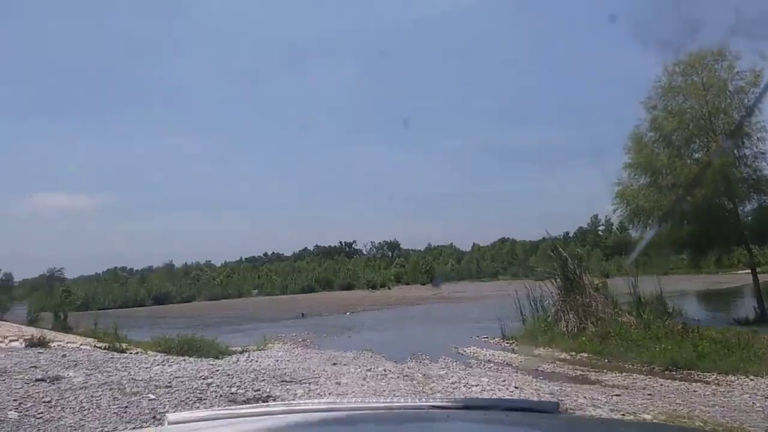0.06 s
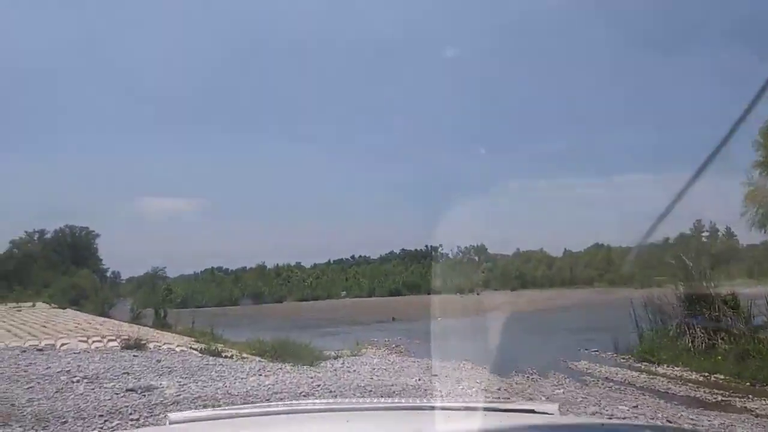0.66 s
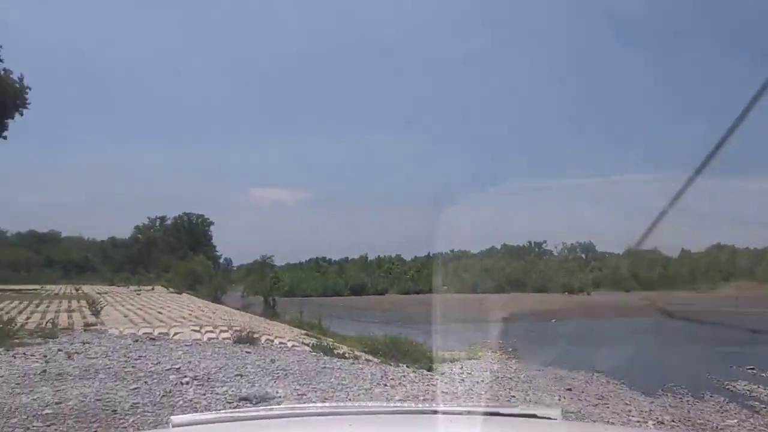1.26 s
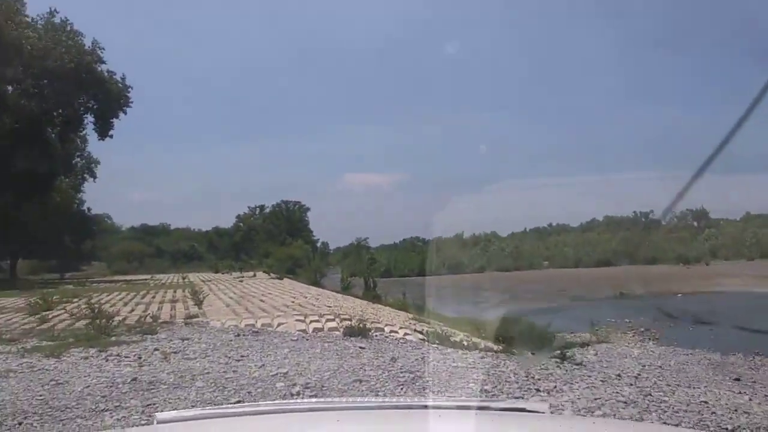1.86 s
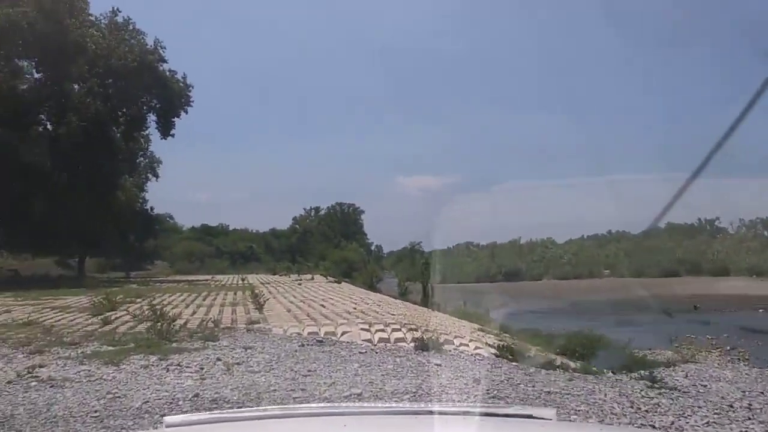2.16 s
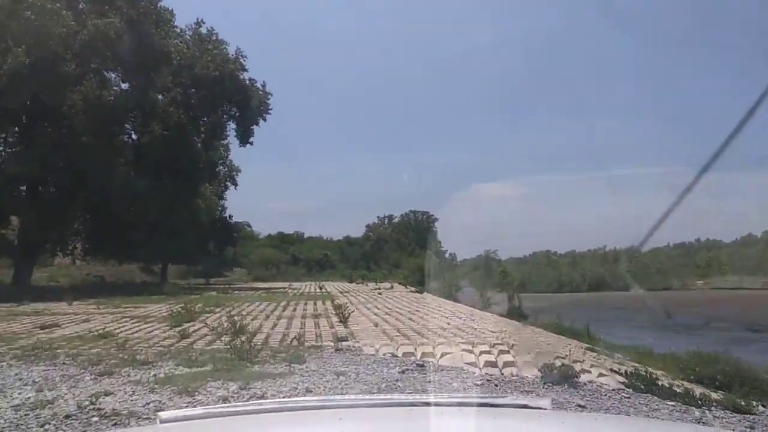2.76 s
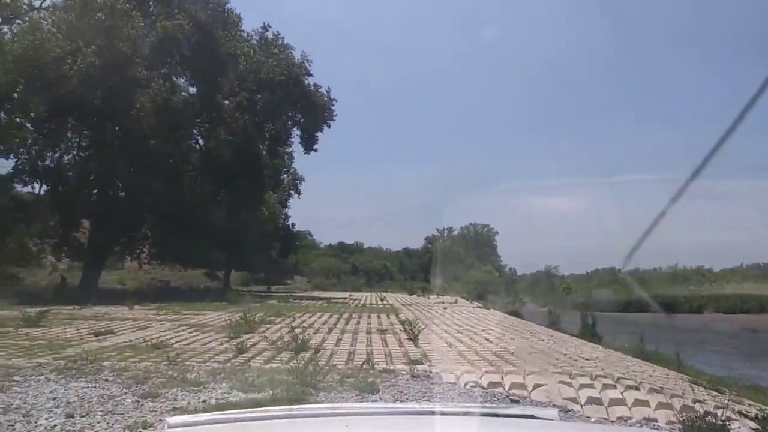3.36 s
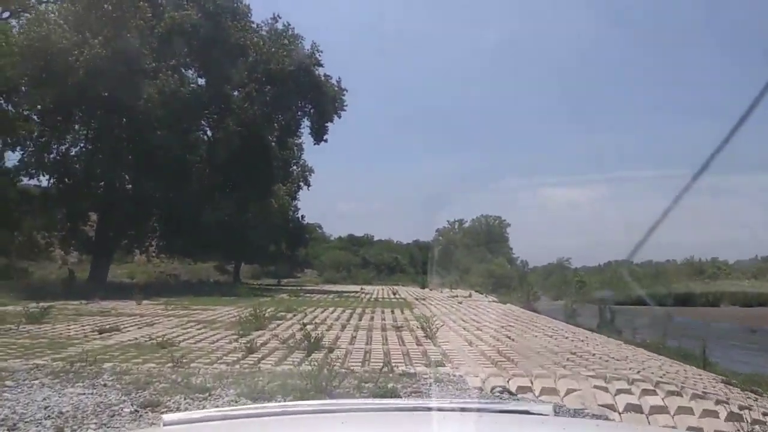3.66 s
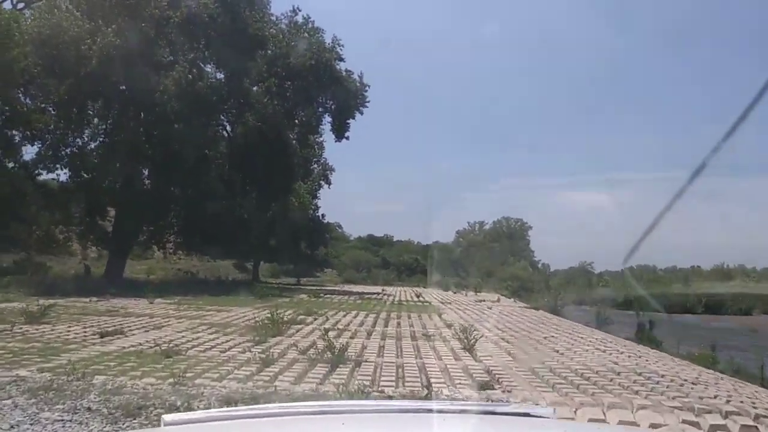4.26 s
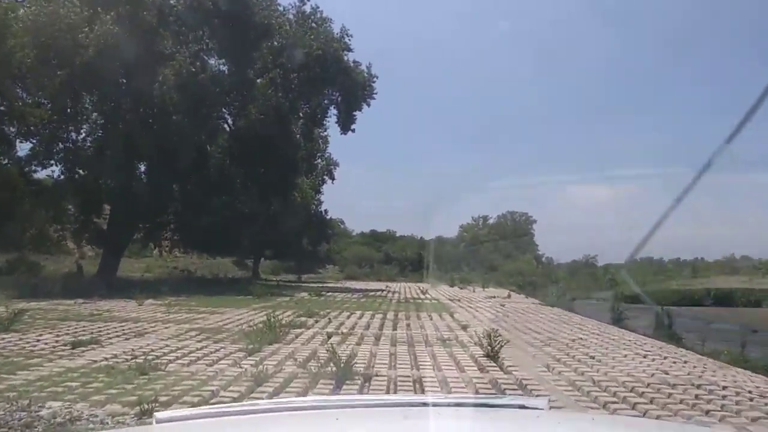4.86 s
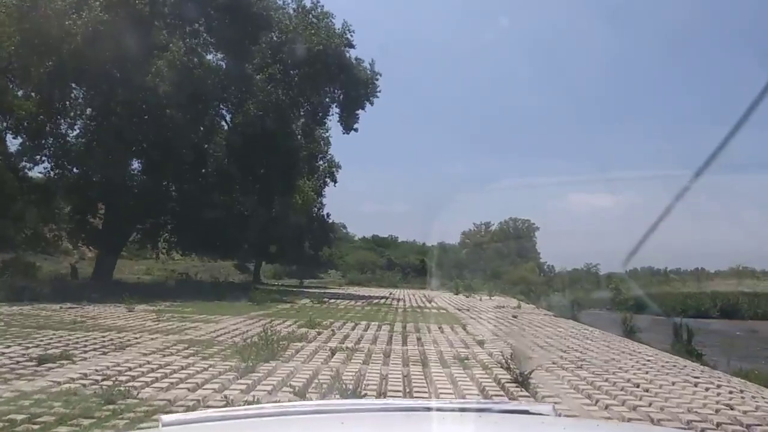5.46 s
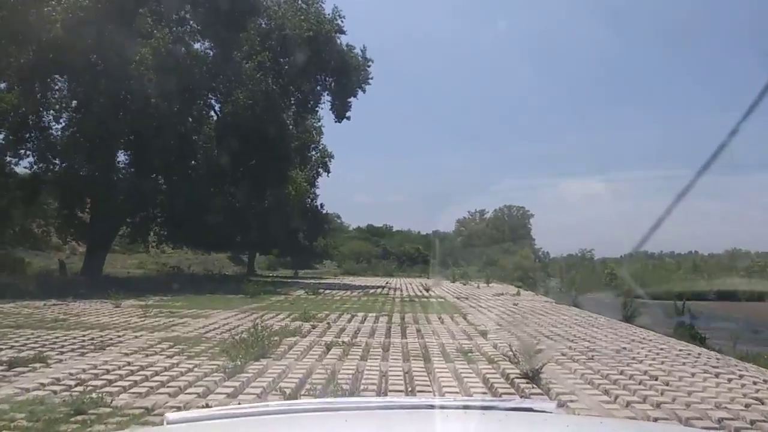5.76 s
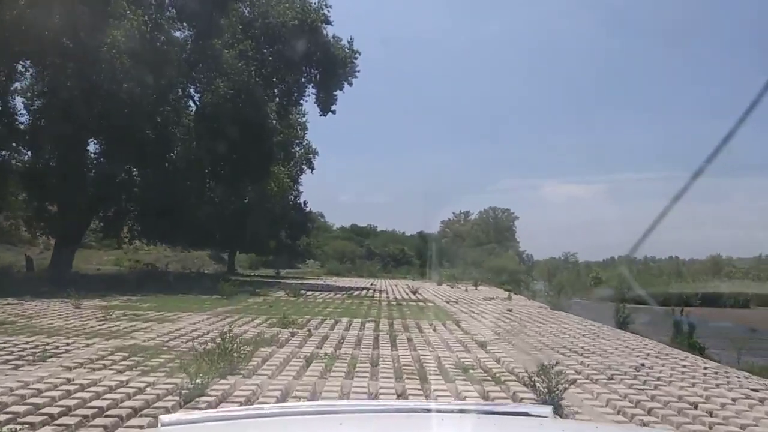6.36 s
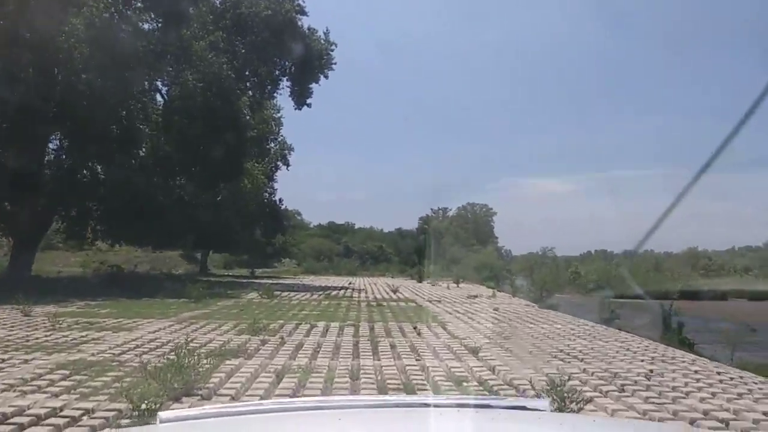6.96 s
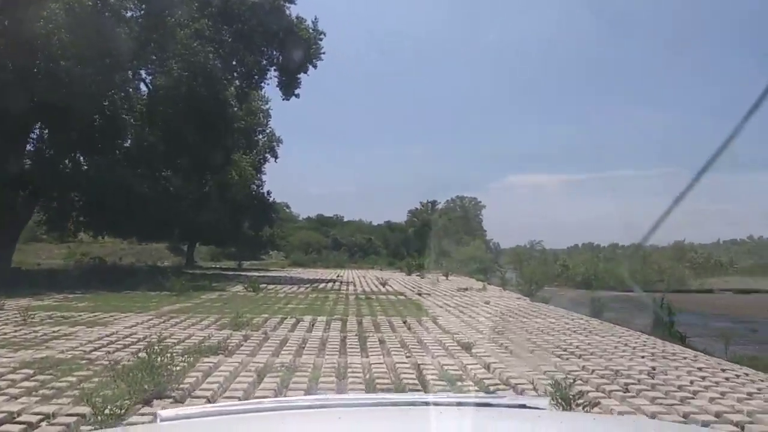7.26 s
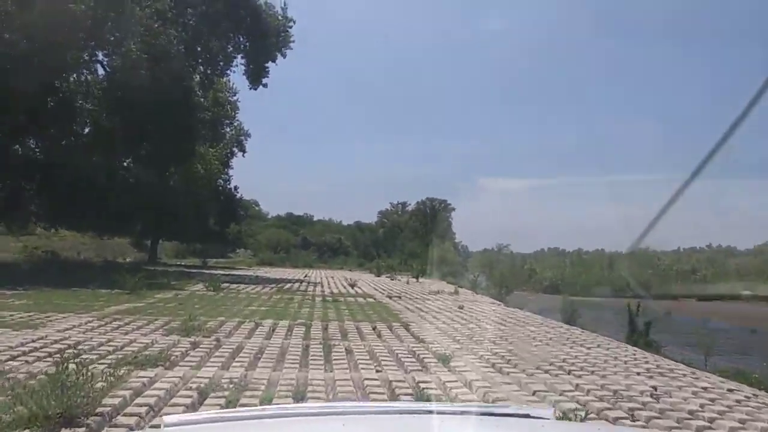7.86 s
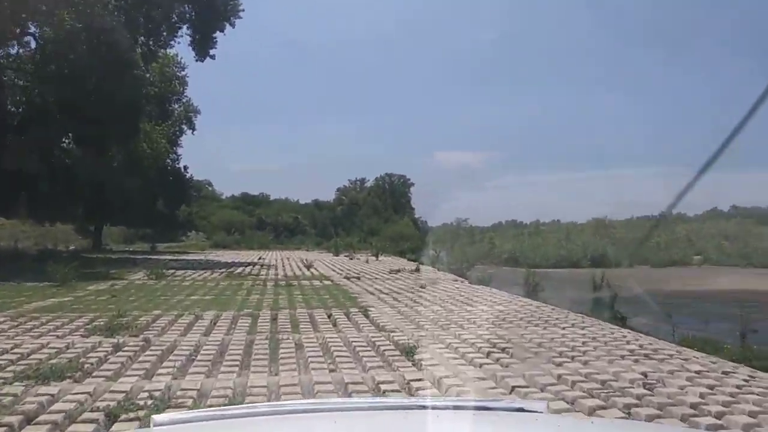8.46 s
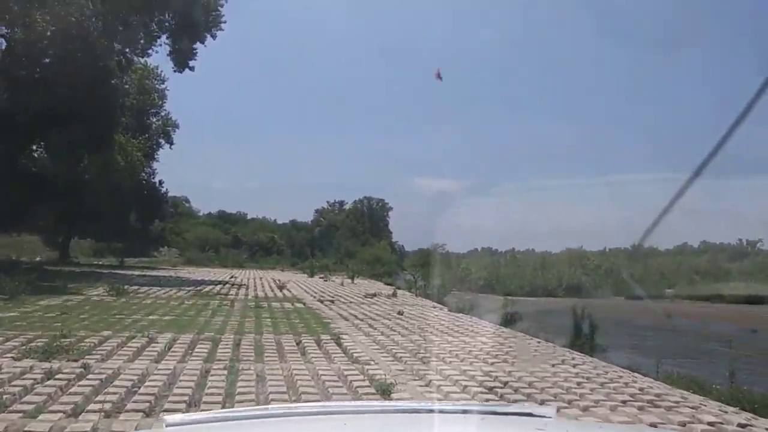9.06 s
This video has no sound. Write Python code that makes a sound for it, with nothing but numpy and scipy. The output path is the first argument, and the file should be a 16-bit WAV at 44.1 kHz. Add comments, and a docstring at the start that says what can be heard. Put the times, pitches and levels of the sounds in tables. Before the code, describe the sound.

A pickup truck creeps over gravel and onto concrete pavers, heard from inside the cab. The engine drones low near idle, rising briefly with one touch of throttle at the start. Stones grind, crackle and pop under the tyres throughout. Rough ground brings a low rumble, rattling panels and irregular knocks from the body, with the heaviest booming jolt a little past halfway. Small hard pieces clink faintly now and then.

```python
"""A low engine drone and crunching gravel, heard from the cab of a pickup creeping onto concrete pavers.
The firing tone stays near idle after one touch of throttle; its overtones set a panel buzzing.
Rough ground booms in the cab's air, rattles the panels and makes the body knock.
Stones grind, pop and slide under the tyres. Now and then something small and hard clinks,
and a thin hiss comes and goes."""
import sys
import numpy as np
from scipy import signal
from scipy.fft import rfft, irfft, next_fast_len
from scipy.io import wavfile
from scipy.ndimage import map_coordinates

SR = 44100
rng = np.random.default_rng(int(sys.argv[2]) if len(sys.argv) > 2 else 0)


def digitize_waveform(pressure):
    """Quantize a signal to 16-bit integers and store it at the path in sys.argv[1].

    Rows of a 2-D input are taken as channels; values are limited to [-1, 1].
    """
    field = np.atleast_2d(pressure).T
    bounded = np.clip(field, -1, 1)
    quanta = np.round(bounded * 32767).astype(np.int16)
    wavfile.write(sys.argv[1], SR, quanta)


N = 406602

# Engine speed. Each row: time in seconds, firing rate in Hz.
FIRING_HZ = [(0, 51.86), (.36, 51.6), (.46, 59.1), (.55, 65.8), (.65, 72.5), (.75, 72.6), (.87, 64),
             (1.1, 58.1), (1.6, 58.67), (2.3, 57.1), (4.5, 55.8), (8, 55.28), (8.6, 53.92), (9.22, 55.36)]
# Engine load. Each row: time in seconds, firing tone level in dB.
LOAD_DB = [(0, -25), (.35, -24.5), (.58, -21), (1.2, -24), (1.8, -21), (2.1, -24.5), (2.62, -20),
           (3.3, -25), (3.52, -19), (3.8, -23), (4.28, -21), (4.8, -22), (5.15, -20), (6.3, -19.5),
           (7.1, -24.5), (7.95, -22), (8.65, -24), (9.22, -20.5)]
# Ground shake and low tyre roar. Each row: time in seconds, drive in dB over average.
SHAKE_DB = [(0, -7.5), (.2, -9), (.58, -1), (.88, -5), (1.03, -4), (1.6, 1), (2.1, -2), (2.85, 1),
            (3.72, 1), (4.0, -3), (4.5, 1.5), (5.25, 0.5), (5.5, 8.5), (5.7, 1.5), (6.75, 0), (7.02, -3),
            (7.6, -3.5), (7.9, 1.5), (8.2, -0.5), (8.5, 1), (9.05, -9), (9.22, 5)]
ROAR_DB = [(0, -11.5), (.2, -1.5), (.35, -5), (.56, 3.5), (.88, 1.5), (1.03, -5), (1.28, 4), (1.7, -1.5),
           (2.62, 0.5), (2.85, 2.5), (3.15, -0.5), (3.35, 3), (4.1, -2.5), (4.55, 2), (4.7, -5),
           (4.92, 1.5), (5.25, -2), (5.5, 8), (5.72, -0.5), (6.5, 1.5), (6.78, 1), (7.55, -3), (7.8, 1),
           (8.7, -3.5), (9.22, -7.5)]
# Loose gravel. Each row: time in seconds, coarse stones and grit in relative dB.
GRAVEL_DB = [(0, -53, -53), (.3, -56.5, -58.5), (.58, -44, -43.5), (.8, -49, -52.5), (1.2, -44, -48),
             (1.55, -46.5, -49.5), (2.1, -44, -43.5), (2.57, -50, -52.5), (2.9, -43, -42), (3.08, -46, -50),
             (3.38, -46, -43.5), (4.1, -48, -47.5), (5.3, -44, -46), (5.5, -40.5, -42), (6.05, -49, -48.5),
             (6.55, -49, -47.5), (6.8, -44, -40), (7.02, -56, -51.5), (7.27, -45, -44.5),
             (7.58, -53.5, -51.5), (7.9, -51, -45.5), (8.35, -46, -48), (8.88, -47.5, -52.5),
             (9.22, -45, -47)]

# Hiss swells. Each row: centre in seconds, level in dB, half length in seconds.
HISSES = [(1.102, -57, 0.19), (3.75, -71, 0.22), (7.88, -55, 0.17)]
# Loudest snapping stones. Each row: start in seconds, then level, low body and high edge in relative dB.
POPS = [(.2638, -34.5, -6, -36), (.336, -38.5, -2, -38), (0.411, -34, -0.5, -33), (.425, -52, 13, -30),
        (0.529, -33.5, 1, -33), (.596, -45, 11, -30), (0.663, -34.5, 7.5, -25), (0.7188, -39, 9.5, -32),
        (0.769, -48, 10, -28), (0.9351, -36.5, 4, -33), (0.9866, -35, 6.5, -31), (1.108, -46.5, 10, -32),
        (1.1625, -30.5, -1, -35), (1.2294, -35, 8.5, -35), (1.297, -34, 8, -28), (1.33, -33, -1, -31),
        (1.356, -31, 5.5, -29), (1.393, -37.5, 7, -28), (1.444, -29, 0.5, -33), (1.464, -50, 9, -30),
        (1.696, -27.5, -17, -33), (2.1106, -31, 1, -31), (2.203, -37, -10, -26), (2.287, -31.5, -9, -35),
        (2.463, -28.5, -10, -37), (2.804, -29.5, -9, -33), (2.9308, -38, 10, -26), (2.9685, -27, -2, -33),
        (2.995, -35, 9.5, -34), (3.036, -30, -11, -34), (3.0998, -29, -12, -33), (3.2037, -30, -5, -36),
        (3.225, -28, -3, -32), (3.289, -28, -15, -34), (3.324, -34, -6, -28), (3.406, -28, -3.5, -28),
        (3.472, -36, -15, -22), (3.526, -33.5, -13, -32), (3.553, -40, -8, -30), (3.593, -38, -6, -28),
        (3.7488, -33, 3, -32), (3.823, -26.5, -2, -28), (3.8767, -32.5, 6, -35), (4.1591, -32.5, -19, -31),
        (4.375, -35, 1, -30), (4.449, -37.5, 6, -32), (4.574, -50, 15, -32), (4.618, -30.5, -9, -34),
        (4.644, -47, 13, -32), (4.746, -41, 8.5, -32), (4.7792, -29, 2, -25), (4.8346, -23.5, 2.5, -19),
        (4.9066, -31.5, 4, -28), (4.9326, -32.5, 4, -29), (5.04, -32.5, 3, -34), (5.1007, -37.5, 9, -29),
        (5.162, -38, 9, -26), (5.185, -31, -8, -30), (5.215, -28, -3, -32), (5.29, -48, 19.5, -33),
        (5.4477, -24, -18, -33), (5.5173, -30, 1, -30), (5.638, -29.5, -1, -32), (5.662, -27, 0, -25),
        (5.692, -23.5, -1.5, -22), (5.723, -28, -5, -27), (5.893, -43.5, 14, -32), (5.970, -32, -7, -30),
        (5.982, -37, -6, -21), (6.132, -31.5, -12, -19), (6.1588, -29.5, -13, -30), (6.222, -34, -16, -32),
        (6.452, -29, -3.5, -33), (6.478, -34, -5, -19), (6.52, -27.5, -2.5, -35), (6.587, -44, 7, -32),
        (6.651, -48, 12, -32), (6.77, -29, -2.5, -30), (6.805, -35, -15, -20), (6.8795, -33, -8, -17),
        (7.019, -35, -8, -26), (7.055, -42, 4, -32), (7.166, -31, -5, -32), (7.24, -36, 1, -29),
        (7.2712, -22.5, -15, -21), (7.303, -31, -13, -34), (7.3472, -33.5, 4, -27), (7.38, -32, -5, -29),
        (7.534, -45.5, 15, -33), (7.761, -29, -16, -24), (7.964, -27.5, -8, -28), (7.992, -29, -12, -20),
        (8.114, -26.5, 2, -22), (8.1413, -33.5, 7, -22), (8.177, -23, -1.5, -18), (8.206, -32.5, 5.5, -25),
        (8.242, -33, -9, -26), (8.251, -36, -4, -11), (8.276, -29, -10, -28), (8.335, -45, 12, -32),
        (8.395, -41.5, 11, -35), (8.422, -31, -15, -32), (8.443, -41, -8, -20), (8.475, -32.5, -4, -32),
        (8.5838, -25.5, -8, -33), (8.626, -43, -4, -32), (8.6492, -28.5, -6, -35), (8.7325, -30.5, -2, -29),
        (8.8108, -34, 8, -36), (8.875, -49.5, 16, -32), (9.108, -39, 9.5, -32)]
# Wheel drops into ruts and paver gaps. Each row: start in seconds, heave and boom in relative dB.
JOLTS = [(0.886, -5.5, -8), (1.572, -29, -4), (1.788, -11, -17), (2.695, -28, -14), (2.85, -24, -19),
         (5.419, -6, -3.5), (5.477, -1.5, -7), (5.537, -2, -3), (6.2, -22, 0.5), (6.253, -28, -12)]
# Suspension and body blows. Each row: start in seconds, then ring, thud, clack and punch in relative dB.
KNOCKS = [(0.938, -11.5, -2, -31, -24), (1.565, -8.5, 2.5, -19, -26), (1.603, -12, 8, -16, -18),
          (1.787, -11.5, 12, -10, -25), (1.797, -7.5, 9, -10, -8), (1.813, -9.5, 7, -3.5, -9),
          (1.947, -10.5, 3.5, -0.5, -15), (2.112, -29, -9, 6, -26), (2.351, -8.5, 9, -3, -6.5),
          (2.413, -16, -10, -5, -24), (2.507, -9, 2.5, -9, -14), (2.651, -17, -6, -6, -27),
          (2.688, -10.5, 8.5, -7, -13), (2.700, -12, 16, -2, -13), (2.848, -12, 15, -11, -24),
          (3.287, -21, 0, 0, -16), (3.402, -21.5, 14, -6, -16), (3.751, -23.5, -8, 5, -19),
          (4.481, -17.5, 2, 4, -14), (4.53, -23, 14, 0, -31), (4.933, -17, -8, -6, -12),
          (4.999, -11, -11, -14, -15), (5.654, -27, -6, 10, -4), (5.75, -21.5, -3, 5.5, -19),
          (5.904, -14, 1, -15, -30), (6.171, -7, 2, -7, -12), (6.182, -4.5, -1, -21, -8),
          (6.29, -23, -6, -4, -29), (6.566, -7.5, -1, -20, -22), (6.773, -15, 10, -6, -14),
          (7.154, -9, -11, -9, -16), (8.649, -18.5, 8, -1, -16), (8.98, -27, 1, 0, -31),
          (9.076, -20, -4, 0, -28)]
# Small hard pieces. Each row: start in seconds, pitch in Hz, level in relative dB, t60 in seconds,
# mode spread as a share of the pitch.
CLINKS = [(1.411, 6960, -40, 0.064, 0.015), (1.612, 6700, -36, 0.095, 0.051),
          (1.635, 5340, -32, 0.11, 0.052), (2.856, 7050, -33, 0.1, 0.023), (3.68, 7060, -41, 0.075, 0.02),
          (4.245, 7160, -38, 0.088, 0.021), (4.456, 6980, -36, 0.061, 0.038),
          (4.484, 5250, -13, 0.023, 0.096), (5.754, 7400, -39, 0.13, .012),
          (7.461, 5740, -30, 0.094, 0.041), (7.462, 6700, -34, 0.09, 0.061),
          (9.146, 7340, -39, 0.09, 0.0067), (9.205, 7220, -30, 0.089, 0.0059)]
# Gravel giving way. Each row: start in seconds, level in dB, rise and t60 in seconds,
# coarse stones and high edge in relative dB.
SLIDES = [(1.788, -30.5, 0.019, 0.25, 1, -30), (1.865, -37, 0.036, 0.26, -5, -24),
          (4.374, -40, 0.011, 0.23, -2, -28), (4.482, -28.5, 0.004, 0.074, -11, -18),
          (4.525, -40, 0.016, 0.52, -6, -24), (5.636, -42, 0.033, 0.34, -0.5, -28),
          (6.17, -42, 0.013, 0.19, -13, -25), (7.69, -40.5, 0.056, 0.17, -12, -28),
          (8.95, -45.5, 0.1, 0.27, -7, -15)]

# Cab air modes, heave then boom. Each row: frequency in Hz, width in Hz.
CAB_MODES = [(66, 10.2), (135, 8.2)]
# Wheel well and body panel modes. Each row: frequency in Hz, width in Hz, gain in dB.
WELL_MODES = [(1393, 390, 10.5), (1558, 190, 12), (1730, 150, 7.5), (2133, 135, 9), (2980, 250, 0.5),
              (3690, 280, 4.5), (5300, 190, -3)]
PANEL_MODES = [(230, 11.7, -1.5), (273.3, 25, 2), (335.6, 26.3, 1), (410, 29.4, 2), (470.5, 31, 2),
               (516, 27, -2), (611.6, 40, -3.5), (745, 31, -4), (864, 49, -0.5), (924, 34, -6),
               (1010, 44, -10.5), (1280, 44, -17)]

# Noise spectra. Each row: frequency in Hz, relative density in dB.
BOOM_SPECTRUM = [(20, -45), (38, -30), (50, -6), (58, -3.5), (82, -5), (105, -5), (133, -.5), (165, -2),
                 (200, -23), (260, -31)]
TYRE_SPECTRUM = [(130, -61), (185, 1), (230, 3), (285, 0), (320, -2), (400, -7), (480, -20), (700, -50)]
RATTLE_SPECTRUM = [(280, -50), (420, -1), (490, 1.5), (580, -2.5), (720, -4.5), (900, -7.5), (1050, -13.5),
                   (1400, -22), (2500, -27)]
COARSE_SPECTRUM = [(700, -39), (1100, -3), (1550, -2.5), (1900, -4), (2300, -4.5), (2750, -10.5),
                   (3500, -12.5), (5000, -26)]
GRIT_SPECTRUM = [(2000, 0), (3200, 2), (4400, 3), (5300, 1), (6800, -0.5), (7500, -4.5), (8100, -8.5),
                 (10200, -13.5), (12000, -21), (15800, -30)]
HISS_SPECTRUM = [(4000, -28), (4900, -1), (5250, 14), (5700, -18), (6600, 5), (7500, -32)]
SNAP_SPECTRUM = [(1800, -11), (3000, -1), (3800, -4.5), (4600, -5), (5400, 1.5), (5900, -3), (6600, 2),
                 (7550, -4.5), (8100, -11.5), (10400, -14), (11500, -29)]
EDGE_SPECTRUM = [(8000, -9), (10400, -12), (12000, 2), (15800, -7)]
RUSH_SPECTRUM = [(1500, -38), (2400, -2), (3500, 1), (4800, 1.5), (6400, 1.5), (7500, -6), (9500, -12),
                 (11500, -32), (15800, -46)]
SAND_SPECTRUM = [(7000, -6), (8500, -4), (11000, 0), (12500, -6), (15800, -12)]
FLOOR_SPECTRUM = [(2000, 3), (7500, -3), (8500, -2), (11400, -7.5), (12100, -10), (15800, -19)]


def amp(db):
    """Amplitude ratio from dB."""
    return 10 ** (np.asarray(db) / 20)


def unit(x):
    """x at rms 1."""
    return x / np.sqrt(np.mean(x ** 2) + 1e-20)


def curves(rows):
    """One value per sample for each column after the time."""
    times_s, *columns = np.transpose(rows)
    return [np.interp(np.arange(N) / SR, times_s, column) for column in columns]


def wobble(rate_hz):
    """Smooth random curve with knots at rate_hz."""
    knots = rng.standard_normal(int(N * rate_hz / SR) + 4)
    return map_coordinates(knots, [np.arange(N) * rate_hz / SR])


def colour(x, spectrum):
    """x shaped by a spectrum, at rms 1."""
    n_fft = next_fast_len(len(x) + 4096)
    hz, db = np.transpose(spectrum)
    log_hz = np.log(np.fft.rfftfreq(n_fft, 1 / SR) + 1)
    gain = amp(np.interp(log_hz, np.log(hz), db, left=-120, right=-120))
    return unit(irfft(rfft(x, n_fft) * gain, n_fft)[:len(x)])


def resonate(x, modes, shift, top_hz):
    """x through modes, each detuned by its shift factor, muffled above top_hz, at rms 1."""
    mode_hz, width_hz, db = np.transpose(modes)[:, :, None]
    hz = np.fft.rfftfreq(len(x), 1 / SR)
    damping = 1j * hz * width_hz
    response = amp(db) * damping / ((mode_hz * shift) ** 2 - hz ** 2 + damping)
    return unit(irfft(rfft(x) * response.sum(0) / (1 + (hz / top_hz) ** 6), len(x)))


def fade(t, rise_s, t60_s):
    """Linear rise, exponential decay."""
    return np.minimum(t / rise_s, 1) * np.exp(-np.log(1000) * np.maximum(t - rise_s, 0) / t60_s)


def add(track, start_s, sound):
    """Mix a sound into a track."""
    start = max(round(start_s * SR), 0)
    part = track[start:start + len(sound)]
    part += sound[:len(part)]


def impacts(spectrum, per_s, spread_db, t60_s, bed):
    """Random unequal impacts, smeared by reflections, over a bed of fainter ones, at rms 1."""
    hits = rng.random(N) < per_s / SR
    size = amp(spread_db * np.clip(rng.standard_normal(N), -1.6, 1.6))
    smear = fade(np.arange(SR // 8) / SR, 0.00067, t60_s)
    energy = np.abs(signal.fftconvolve(hits * size ** 2, smear ** 2)[:N])
    return unit(np.sqrt(energy / energy.mean() + bed) * colour(rng.standard_normal(N), spectrum))


def engine():
    """The firing tone swells as the cab rocks; unequal cylinders add weak orders around it."""
    sway_hz, sway_db, drift_cycles = 1.8, 3.2, 0.31
    firing_hz, = curves(FIRING_HZ)
    load_db, = curves(LOAD_DB)
    sway = np.sin(2 * np.pi * (sway_hz * np.arange(N) / SR + drift_cycles * wobble(sway_hz)))
    phase = 2 * np.pi * np.cumsum(firing_hz * (1 + 0.007 * wobble(12))) / SR
    tone = np.sin(phase)
    orders = np.array([6, 7, 9, 10, 12, 16, 24]) / 8
    for order, db in zip(orders, [-20, -14.5, -24, -15.5, -27, -14.5, -23.5]):
        tone += amp(db + 5.2 * wobble(5.5)) * np.sin(order * phase + 2 * np.pi * rng.random())
    level_db = load_db + sway_db * sway + 0.5 * wobble(14)
    return amp(level_db) * unit(tone) + panel_buzz(firing_hz, phase)


def panel_buzz(firing_hz, phase):
    """Engine overtones sing out as they sweep through a panel's resonance."""
    panel_hz, width_hz, idle_hz, db_per_hz = 274.3, 35, 56.4, 0.55
    level = amp(-35 + db_per_hz * (firing_hz - idle_hz) + 2.7 * wobble(9.7))
    buzz = np.zeros(N)
    for harmonic in (4, 5):
        response = 1 / (1 + 2j * (harmonic * firing_hz - panel_hz) / width_hz)
        buzz += (response * np.exp(1j * harmonic * phase)).real
    return level * buzz


def road():
    """Bumps roar through the tyres, boom in the cab and rattle its panels."""
    bump_hz = 13
    shared_bumps_db = 0.9 * wobble(bump_hz)

    def level(base_db, slope, drive):
        drive_db = curves(drive)[0] + shared_bumps_db
        return amp(base_db + slope * drive_db + 0.8 * wobble(bump_hz))

    boom = level(base_db=-24, slope=0.88, drive=SHAKE_DB)
    boom *= colour(rng.standard_normal(N), BOOM_SPECTRUM)
    tyres = level(base_db=-25.5, slope=0.68, drive=ROAR_DB)
    tyres *= impacts(TYRE_SPECTRUM, per_s=120, spread_db=-2, t60_s=0.04, bed=0.99)
    rattle = level(base_db=-37, slope=0.54, drive=SHAKE_DB)
    rattle *= impacts(RATTLE_SPECTRUM, per_s=80, spread_db=3, t60_s=0.12, bed=0.28)
    return boom + tyres + rattle


def crunch():
    """Coarse stones grind and fine grit crackles, varying from patch to patch."""
    coarse_db, grit_db = curves(GRAVEL_DB) + 0.56 * wobble(12)
    coarse = impacts(COARSE_SPECTRUM, per_s=110, spread_db=3.5, t60_s=0.045, bed=0.32)
    grit = impacts(GRIT_SPECTRUM, per_s=140, spread_db=4.5, t60_s=0.045, bed=0.63)
    return amp(coarse_db - 1.04) * coarse + amp(grit_db - 2) * grit


def hiss():
    """A narrow, fluttering hiss swells now and then over a faint steady one."""
    t = np.arange(N) / SR
    floor = amp(-67.5) * colour(rng.standard_normal(N), FLOOR_SPECTRUM)
    swells = sum(amp(db) * np.exp(-((t - centre_s) / half_s) ** 2) for centre_s, db, half_s in HISSES)
    flutter = amp(2.9 * wobble(27))
    return floor + swells * flutter * colour(rng.standard_normal(N), HISS_SPECTRUM)


def small_pops(per_s=3):
    """Lesser stones snap at random, following the grit level. Returns rows like POPS."""
    _, grit_db = curves(GRAVEL_DB)
    starts = np.flatnonzero(rng.random(N) < per_s / SR)
    mean_db, spread_db = (11.5, -6.5, -29), (1, 4, 3)
    levels_db = mean_db + spread_db * rng.standard_normal((len(starts), 3))
    return [(i / SR, grit_db[i] + db, body_db, edge_db)
            for i, (db, body_db, edge_db) in zip(starts, levels_db)]


def pops():
    """A pinched stone snaps free; big ones ring in the wheel well, sharp ones have a bright edge."""
    out, t = np.zeros(N), np.arange(SR // 10) / SR
    for start_s, db, body_db, edge_db in POPS + small_pops():
        snap_noise, body_noise, edge_noise = rng.standard_normal((3, len(t)))
        snap = colour(snap_noise, SNAP_SPECTRUM) * fade(t, 0.00052, 0.075)
        shift = 1 + 0.012 * rng.standard_normal((len(WELL_MODES), 1))
        ring = resonate(body_noise, WELL_MODES, shift, top_hz=6540)
        # The freed stone rattles on against its neighbours.
        tumble = amp(-14) * fade(t, 0.012 * np.exp(0.3 * rng.standard_normal()), 0.039)
        body = amp(body_db + 5) * ring * (fade(t, 0.0015, 0.046) + tumble)
        edge = amp(edge_db + 1) * colour(edge_noise, EDGE_SPECTRUM) * fade(t, 0.0005, 0.04)
        add(out, start_s - 0.0005, amp(db - 7.5) * (snap + body + edge))
    return out


def jolts():
    """A dropping wheel shakes the whole cab, and its air booms."""
    out, t = np.zeros(N), np.arange(SR // 2) / SR
    onset = np.minimum(t / 0.013, 1)
    for start_s, *levels_db in JOLTS:
        boom = sum(amp(db) * np.sin(2 * np.pi * hz * t) * np.exp(-np.pi * width_hz * t)
                   for (hz, width_hz), db in zip(CAB_MODES, levels_db))
        add(out, start_s, amp(-5.5) * boom * onset)
    return out


def knocks():
    """Each blow punches the body once and rings its panels: heavy ones thud, hard ones clack."""
    scatter_db, punch_lag_s, punch_half_cycles = 2.5, 0.00275, 0.64
    out, t = np.zeros(N), np.arange(SR // 5) / SR
    hz, width_hz, mode_db = np.transpose(PANEL_MODES)[:, :, None]
    rise_s = np.interp(hz, [280, 500], [0.012, 0.006])  # large, low panels start slower
    envelope = np.minimum(t / rise_s, 1) * np.exp(-np.pi * width_hz * t)
    punch_onset = t / (t + 0.0013)  # softened by rubber mounts
    for start_s, db, thud_db, clack_db, punch_db in KNOCKS:
        strength, detune, phase = rng.standard_normal((3, len(PANEL_MODES), 1))
        tilt_db = np.interp(hz, [300, 450, 850], [thud_db, 0, clack_db + 9])
        gains = amp(mode_db + tilt_db + scatter_db * strength)
        modes = np.sin(2 * np.pi * (hz * (1 + 0.027 * detune) * t + phase))
        add(out, start_s - 0.001, amp(db - 12) * (gains * modes * envelope).sum(0))
        punch_hz = 580 + 13.5 * clack_db
        cycles = punch_hz * (t - punch_lag_s)
        punch = np.sin(2 * np.pi * cycles) * np.exp(-(cycles / punch_half_cycles) ** 2)
        add(out, start_s, amp(punch_db) * punch_onset * punch)
    return out


def clinks():
    """Small hard pieces ring in a cluster of high modes: tight for a ping, wide for a clack."""
    out, t = np.zeros(N), np.arange(SR // 5) / SR
    for start_s, hz, db, t60_s, spread in CLINKS:
        detune, phase = rng.standard_normal((2, 24, 1))
        ring = np.sin(2 * np.pi * (hz * (1 + spread * detune) * t + phase)).sum(0)
        add(out, start_s, amp(db - 6) * unit(ring) * fade(t, 0.0016, t60_s))
    return out


def slides():
    """Gravel gives way in a dense rush; coarse stones rattle the body, sand adds a bright edge."""
    rush_level, coarse_level, sand_level = np.zeros((3, N))
    t = np.arange(SR // 2) / SR
    for start_s, db, rise_s, t60_s, coarse_db, edge_db in SLIDES:
        stroke = amp(db) * fade(t, rise_s, t60_s)
        add(rush_level, start_s, stroke)
        add(coarse_level, start_s, amp(coarse_db) * stroke)
        add(sand_level, start_s, amp(edge_db) * stroke)
    rush, coarse, rattle, sand = (
        impacts(spectrum, per_s=350, spread_db=5.5, t60_s=0.055, bed=0.6)
        for spectrum in (RUSH_SPECTRUM, COARSE_SPECTRUM, RATTLE_SPECTRUM, SAND_SPECTRUM))
    stones = amp(1) * coarse + amp(10.5) * rattle
    return rush_level * rush + coarse_level * stones + sand_level * sand


def stone_colours(x, spread_db):
    """Each stone has its own colour: brief, narrow patches of the spectrum stand out."""
    frames = signal.stft(x, nperseg=512)[2]
    patch = np.outer(np.hanning(6), np.hanning(5))
    field = signal.fftconvolve(rng.standard_normal(frames.shape), patch, "same")
    gain = unit(amp(spread_db * unit(field)))
    return signal.istft(frames * gain, nperseg=512)[1][:N]


def cab_reflections(x, wet_db, t60_s):
    """Glass and trim add a brief spray of reflections."""
    t = np.arange(SR // 10) / SR
    tail = rng.standard_normal(len(t)) * fade(t, 0.0055, t60_s)
    return x + amp(wet_db) * signal.fftconvolve(x, tail / np.linalg.norm(tail))[:N]


def scene():
    """Mono mix in the cab."""
    stones = pops() + stone_colours(crunch() + slides(), spread_db=2.2)
    gravel = amp(-0.57) * cab_reflections(stones, wet_db=-15, t60_s=0.025)
    return (engine() + road() + jolts() + knocks() + gravel + clinks() + hiss())[None]


def record(dry):
    """Round off the peaks, taper the ends, cut the deepest bass and the top treble."""
    ceiling, low_cut_hz, top_hz = 0.75, 33, 15850
    limited = dry / (1 + (dry / ceiling) ** 6) ** (1 / 6)
    tapered = limited * signal.windows.tukey(N, 0.001)
    n_fft = next_fast_len(N + SR // 4)
    hz = np.fft.rfftfreq(n_fft, 1 / SR)
    high_pass = 1 - 1 / (1 + (hz / low_cut_hz) ** 6)
    return irfft(rfft(tapered, n_fft) * high_pass * (hz < top_hz), n_fft)[..., :N]


dry = scene()
out = record(dry)
digitize_waveform(out)
```